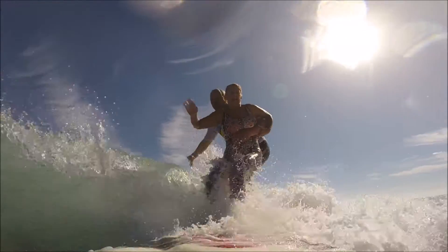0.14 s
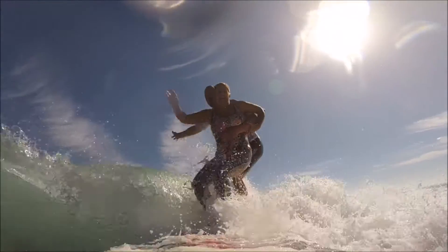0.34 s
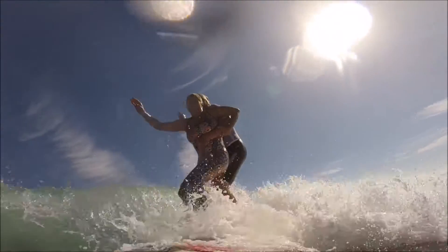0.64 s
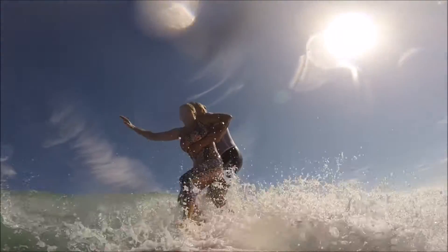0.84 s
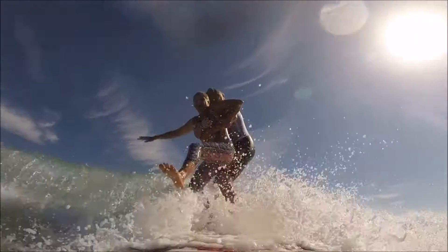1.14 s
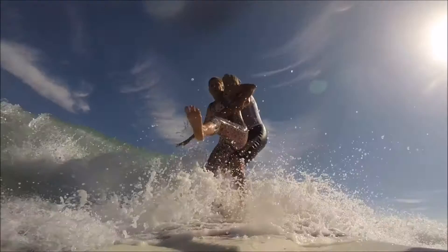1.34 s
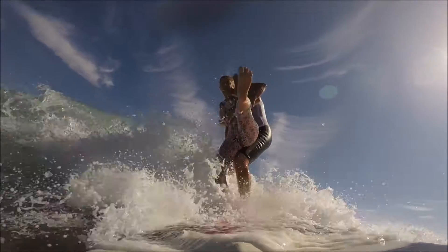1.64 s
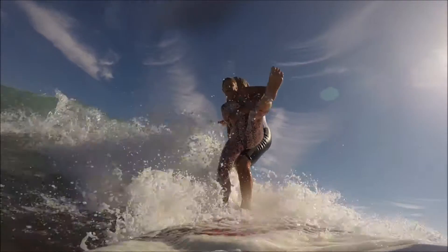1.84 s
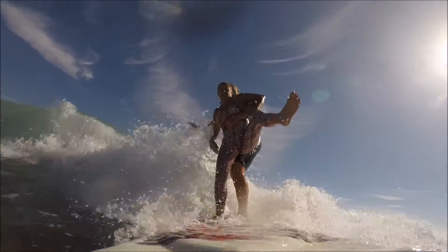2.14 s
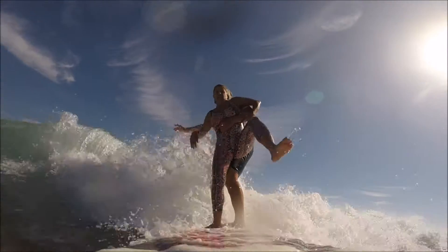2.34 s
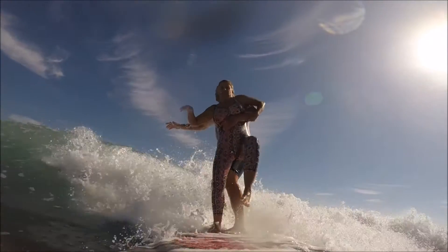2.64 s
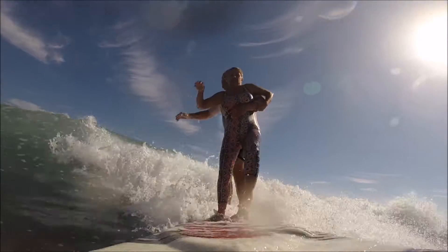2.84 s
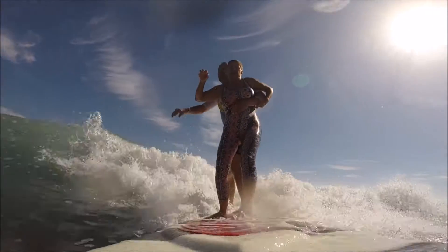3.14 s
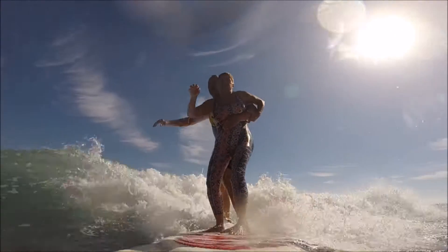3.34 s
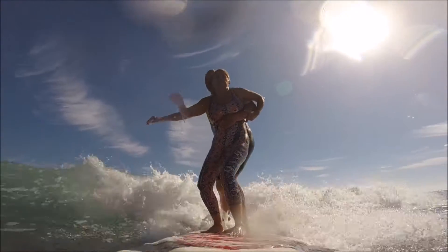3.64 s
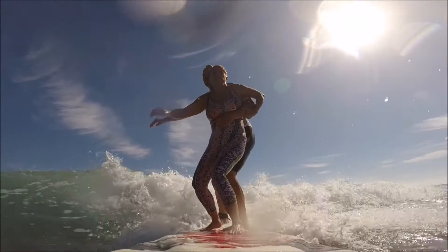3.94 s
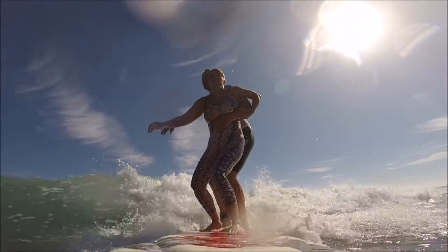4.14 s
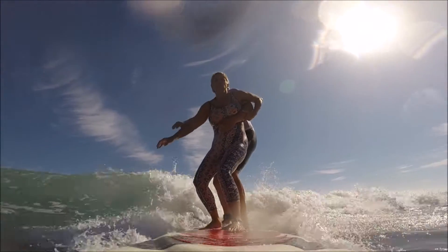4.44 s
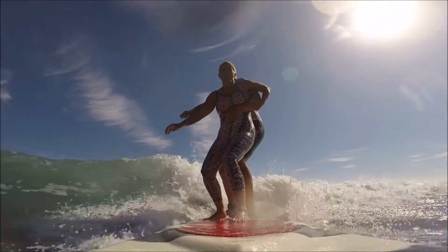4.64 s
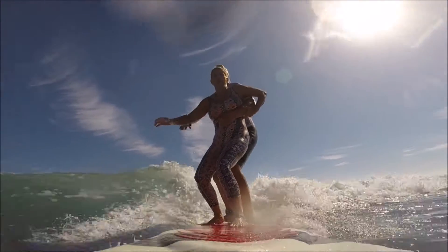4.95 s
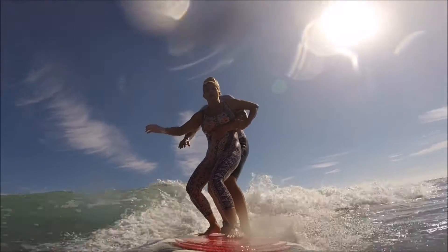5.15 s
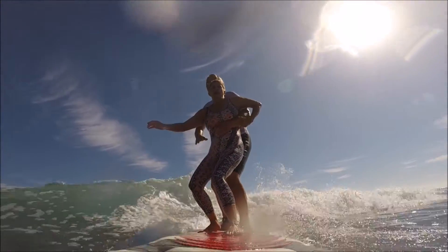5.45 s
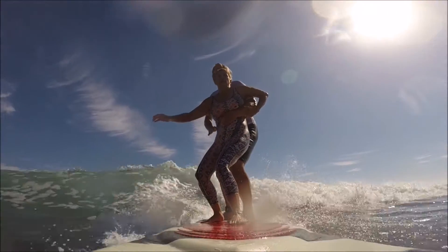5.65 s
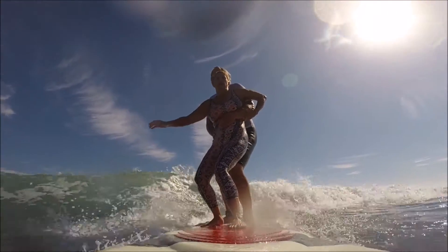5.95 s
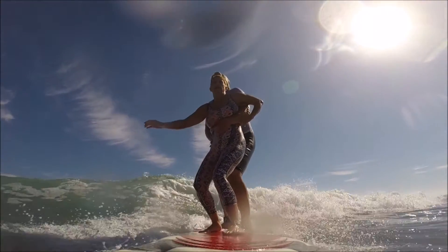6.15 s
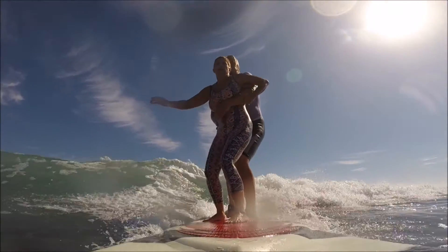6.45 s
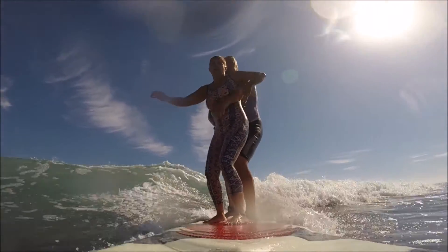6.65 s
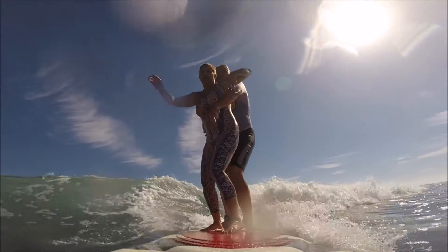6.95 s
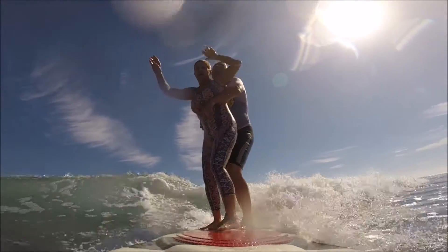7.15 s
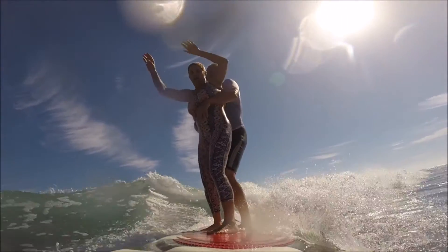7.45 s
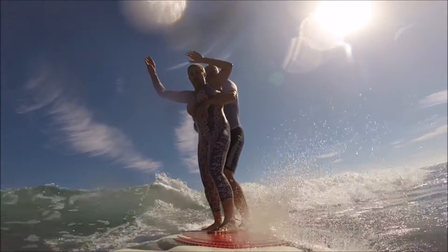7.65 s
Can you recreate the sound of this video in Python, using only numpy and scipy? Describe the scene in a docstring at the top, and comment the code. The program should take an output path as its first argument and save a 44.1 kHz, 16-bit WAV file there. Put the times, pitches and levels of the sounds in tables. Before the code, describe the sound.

Wind throbs deeply on a surfboard's microphone while muffled whitewater churns, slaps the board and throws hissing spray and ticking drops.

```python
"""A deep throb and churning water, heard from a waterproof camera on a surfboard's nose in breaking surf.
Wind and choppy water shake the case, which makes the throb. Whitewater bubbles under the board,
slaps its nose and throws hissing spray, whose drops tick on the case.
The closed case muffles everything high."""
import sys
import numpy as np
from scipy import signal
from scipy.fft import rfft, irfft, next_fast_len
from scipy.io import wavfile
from scipy.ndimage import uniform_filter1d

SR = 44100
rng = np.random.default_rng(int(sys.argv[2]) if len(sys.argv) > 2 else 0)


def pcm_store(signal):
    """Save signal as 16-bit PCM."""
    levels = np.round(np.clip(np.atleast_2d(signal), -1, 1) * 32767)
    wavfile.write(sys.argv[1], SR, levels.astype(np.int16).T)


N = 343980
TIME = np.arange(N) / SR

# water slapping the nose: t/s, level before muffling/dB, f/Hz, decay/s, thrown spray/dB
NOSE_SLAPS = [(.454, -3.5, 1043, 0.0086, -26), (.554, -12, 456, .012, -42), (.566, -7.5, 450, .009, -34),
              (.573, -8.5, 1530, 0.0069, -27.5), (.627, -11, 757, .013, -38), (.752, -7, 230, 0.0056, -49),
              (1.469, -17.5, 272, 0.0096, -50), (1.592, -20.5, 327, .012, -51),
              (1.716, -16, 787, .012, -43), (2.686, -14, 814, 0.003, -44), (3.141, -18.5, 397, .0076, -41),
              (3.262, -15, 700, .0063, -44), (3.746, -12, 263, 0.019, -38),
              (3.883, -10.5, 344, 0.0038, -47), (4.334, -14, 614, 0.0049, -42),
              (4.443, -10, 400, 0.011, -46), (5.119, -7, 404, 0.011, -37), (5.957, -16.5, 463, .007, -53),
              (6.233, -17, 730, .0055, -45), (6.983, -14.5, 493, .01, -45), (7.009, -12, 600, 0.0034, -42),
              (7.437, -4.5, 540, 0.0085, -35), (7.446, -5.5, 613, 0.0067, -37),
              (7.451, -4, 1000, 0.011, -33), (7.459, -5, 330, 0.0043, -25)]


def undb(db):
    """Turn decibels into a gain to multiply by."""
    return 10 ** (np.asarray(db) / 20)


def unit(x):
    """Scale a sound to an average (rms) level of 1."""
    return x / np.sqrt(np.mean(x ** 2) + 1e-18)


def add(out, s, sound):
    """Mix a short sound into a track, s seconds in."""
    start = int(s * SR)
    out[start:start + len(sound)] += sound


def together(*parts):
    """Combine gains: unrelated sounds add in power."""
    return np.sqrt(sum(part ** 2 for part in parts))


def gains(table):
    """Turn rows of a time and levels into one gain curve per level column."""
    s, *columns = np.transpose(table)
    return [undb(np.interp(TIME, s, column)) for column in columns]


def swell(s, length_s):
    """A smooth rise and fall around time s, above half power for length_s."""
    out = np.zeros(N)
    near = slice(*np.searchsorted(TIME, [s - 2 * length_s, s + 2 * length_s]))
    distance = np.abs(2 * (TIME[near] - s) / length_s)
    out[near] = np.sqrt(.5 ** (distance ** 1.89))  # nearly a bell curve
    return out


def walk(rate):
    """A smooth random wander of size 1, with about `rate` turns a second."""
    hold = max(int(SR / rate), 2)
    steps = np.repeat(rng.standard_normal(N // hold + 1), hold)
    return unit(uniform_filter1d(steps, hold)[:N])


def colour(x, points):
    """Shape the tone along (f/Hz, gain/dB) points, falling 18 dB an octave outside them."""
    size = next_fast_len(len(x) // 2 + SR // 2, real=True) * 2
    hz, db = np.transpose(points)
    octave, knots = np.log2(np.fft.rfftfreq(size, 1 / SR) + 1), np.log2(hz)
    outside_db = -18 * np.abs(octave - np.clip(octave, knots[0], knots[-1]))
    response = undb(np.interp(octave, knots, db) + outside_db)
    # make the filter ring only after a sound, never before it
    cepstrum = irfft(np.log(response))[:size // 2]
    cepstrum[1:] *= 2
    return irfft(rfft(x, size) * np.exp(rfft(cepstrum, size)))[:len(x)]


def textured_noise(texture, db, tone):
    """Noise with a texture mixed in at db, shaped to a tone and scaled to level 1."""
    return unit(colour(rng.standard_normal(N) + undb(db) * texture, tone))


def ring(x, hz, width_hz):
    """Let a sound ring around one pitch."""
    return signal.lfilter(*signal.iirpeak(hz, hz / width_hz, fs=SR), x)


def ring_twice(x, hz, width_hz):
    """Ring twice over, so that less gets through away from the pitch."""
    return ring(ring(x, hz, width_hz), hz, width_hz)


def bubble(hz, length_s, glide):
    """An air pocket rings and rises in pitch as it fades."""
    age = np.linspace(0, 1, int(np.clip(length_s * SR, 2, SR)))
    phase = 2 * np.pi * hz * length_s * age * (1 + glide * age / 2)
    return np.exp(-np.log(100) * age) * np.sin(phase)


def bubbles(low_hz, high_hz, cycles, spread_db, glide, count):
    """A cloud of bubbles of many sizes, few of them loud."""
    out = np.zeros(N + SR)
    for when, pitch, strength, life in rng.random((count, 4)):
        hz = low_hz * (high_hz / low_hz) ** pitch
        db = -spread_db * np.log(strength + 1 / 200)
        add(out, when * N / SR, undb(db) * bubble(hz, cycles * (.5 + life) / hz, glide))
    return unit(out[:N])


def patter(spread_db, count):
    """Countless tiny hits, a few much harder than the rest."""
    when, strength, sign = rng.random((count, 3)).T
    sizes = np.sign(sign - .5) * undb(-spread_db * np.log(strength + 1 / 1000))
    return unit(np.bincount((when * N).astype(int), sizes, N))


def splatter(decay_s, rise_s, grain_db):
    """A burst of uneven noise that swells quickly and dies away."""
    t = TIME[:SR // 4]
    shape = (1 - np.exp(-t / rise_s)) * np.exp(-t / decay_s)
    noise, grain = rng.standard_normal((2, len(t)))
    return noise * undb(grain_db * grain) * shape


def follow_flow(flow, usual_db, slope):
    """A gain that grows by `slope` dB for each dB the water's rush is above its usual level."""
    usual_flow = undb(-25.5)
    return undb(usual_db) * (flow / usual_flow) ** slope


def surges():
    """The board ploughs into humps of water: gain curves for churning, foam and hiss."""
    # humps of water: peak t/s, length/s, churning/dB, foam/dB, hiss/dB
    humps = [(0.5, 0.025, -39.5, -30, -30), (0.548, 0.062, -27, -15.5, -36), (0.658, 0.044, -26, -16, -32),
             (0.714, 0.025, -18.5, -32, -33), (0.784, 0.076, -20.5, -25.5, -50),
             (1.384, 0.32, -23.5, -32, -40), (1.598, 0.056, -20.5, -19.5, -38),
             (1.725, 0.074, -34.5, -20.5, -38), (2.672, 0.11, -22.5, -26.5, -49),
             (2.906, 0.071, -22, -24.5, -45), (3.1, 0.069, -21, -24.5, -48), (3.181, 0.08, -21, -24.5, -55),
             (3.519, 0.08, -16.5, -36, -49), (3.785, 0.18, -15.5, -25.5, -43),
             (4.376, .22, -17.5, -21, -45.5), (4.72, 0.059, -26, -30.5, -59), (4.985, 0.05, -28, -30, -44),
             (5.146, 0.089, -17.5, -24, -44.5), (5.551, 0.079, -32, -29, -44.5),
             (5.736, 0.16, -19.5, -24, -46.5), (5.969, 0.081, -20, -29.5, -58),
             (6.3, 0.061, -17, -20.5, -41), (6.501, 0.051, -18.5, -24, -52),
             (6.608, 0.097, -19.5, -24, -51), (6.947, 0.039, -14, -21.5, -52),
             (7.035, 0.13, -20.5, -19, -45), (7.478, 0.08, -24.5, -22, -37.5)]
    shapes = np.array([swell(s, length_s) for s, length_s, *_ in humps])
    levels = undb([levels_db for _, _, *levels_db in humps])
    return np.sqrt(levels.T ** 2 @ shapes ** 2)


def whistle():
    """A faint, thin whistle comes and goes once in the spray."""
    tone = unit(ring_twice(rng.standard_normal(N), hz=5280, width_hz=450))
    return undb(-64) * swell(3.18, length_s=.36) * tone


def thrown_spray():
    """Gain of the spray that slaps fling up: a sharp crack on the case, then a hiss as it falls back."""
    crack_s, fallback_s, fallback_db = .0052, .049, -10
    power, t = np.zeros(N + SR), TIME[:SR // 2]
    shape = np.exp(-t / crack_s) + undb(fallback_db) * np.exp(-t / fallback_s)
    for s, *_, spray_db in NOSE_SLAPS:
        add(power, s, (undb(spray_db) * shape) ** 2)
    return np.sqrt(power[:N])


def spray(surge):
    """Bursting foam hisses through the case wall while fine mist patters on it."""
    # spray in the air, thinning as the board outruns the breaking wave: t/s, hiss/dB, mist/dB
    spray_levels = [(0, -33.5, -49.5), (.6, -37.5, -57), (1.0, -41, -62), (1.4, -42.5, -56),
                    (1.9, -39, -56), (2.6, -34.5, -55.5), (2.9, -40.5, -58), (3.15, -35.5, -54),
                    (3.9, -44, -60), (4.4, -40, -60), (4.75, -49, -67.5), (5.35, -49.5, -68.5),
                    (5.7, -49.5, -67), (6.75, -43.5, -63), (7.17, -37.5, -64), (7.35, -47.5, -66.5),
                    (7.57, -53, -68), (7.7, -44, -67)]
    # tone of the hiss through the case: f/Hz, gain/dB
    hiss_tone = [(600, -0.5), (1300, 3), (1560, 1), (1690, -8), (1780, -2.5), (2000, -9), (2150, 1),
                 (2320, -4), (2480, -0.9), (2680, 0.5), (2960, -5.5), (3350, -10.5), (3540, -15.5),
                 (3700, -25), (5000, -35.5), (7000, -50)]
    # tone of the mist through the case: f/Hz, gain/dB
    mist_tone = [(2500, -8), (3600, 0.5), (4500, -1), (5300, -4.5), (6100, -7.5), (7000, -13.5),
                 (7600, -17.5)]
    hiss_gain, mist_gain = gains(spray_levels)
    hiss_gain = together(hiss_gain, surge, thrown_spray())
    fizz = bubbles(low_hz=1375, high_hz=3790, cycles=21, spread_db=2, glide=.1, count=5000)
    hiss = textured_noise(fizz, -10, hiss_tone)
    mist = textured_noise(patter(spread_db=3.5, count=14000), -3.5, mist_tone)
    return hiss_gain * hiss * undb(walk(40)) + mist_gain * mist * undb(1.3 * walk(24))


def droplets():
    """Showers scatter small drops at random, listed in rows like the big drops."""
    # showers on the case: start t/s, length/s, typical peak/dB
    showers = [(0.774, 0.074, -62), (1.39, 0.053, -54), (2.745, 0.022, -45), (3.965, 0.037, -47),
               (4.434, 0.016, -49), (4.474, 0.037, -49.5), (5.128, 0.035, -50), (5.197, .065, -53),
               (6.293, 0.093, -53), (6.448, 0.049, -50)]
    drops_per_s, bubble_hz, decay_s, spread_db = 200, 3200, .0017, 9
    rows = []
    for start_s, length_s, db in showers:
        count = int(np.ceil(length_s * drops_per_s))
        for when, pip, tick in rng.random((count, 3)):
            pip_db = db + spread_db * (2 * pip - 1)
            tick_db = db + spread_db * (2 * tick - 1)
            rows.append((start_s + length_s * when, pip_db, bubble_hz, tick_db, decay_s))
    return rows


def drops():
    """A drop taps the case and splatters: the wall gives a crisp tick, the drop's bubble a round pip."""
    # big drops hitting the case: t/s, pip/dB, pip f/Hz, tick/dB, splatter decay/s
    big_drops = [(.217, -27.5, 2900, -39, 0.0054), (.785, -46, 3000, -41, .0006),
                 (0.842, -29.5, 3000, -32.5, 0.0014), (.846, -37, 2800, -44, 0.0011),
                 (1.346, -35, 3300, -35, .0006), (1.419, -23, 3000, -49, 0.0016),
                 (1.444, -28, 3000, -46, .0008), (2.152, -26.5, 2800, -45, 0.0065),
                 (2.176, -35, 3200, -34, 0.00092), (2.732, -24, 3000, -44, 0.00079),
                 (2.742, -21.5, 3000, -47, 0.0026), (2.755, -30, 3150, -42, .004),
                 (3.823, -30, 3100, -54, 0.0011), (3.956, -26.5, 2800, -57, 0.0037),
                 (3.978, -40, 3300, -47, 0.0092), (4.104, -38, 3200, -41, .0006),
                 (4.629, -49, 3000, -45, .0006), (4.924, -36, 3000, -52, 0.0066),
                 (4.936, -31, 2980, -56, 0.0037), (4.968, -34, 2900, -64, 0.0018),
                 (4.986, -26.5, 3050, -61, 0.0018), (5.009, -27.5, 3150, -37, 0.0012),
                 (5.133, -34, 3000, -46, 0.0094), (5.154, -40, 3000, -41, 0.0011),
                 (5.221, -38, 2900, -40, 0.004), (5.262, -39, 3000, -48, 0.0011),
                 (5.759, -34, 2700, -39, 0.0017), (6.326, -33, 3000, -45, .0006),
                 (6.348, -39, 3300, -40, 0.00056), (6.356, -26.5, 3300, -31, 0.0013),
                 (6.46, -18, 3100, -28, 0.0012), (6.485, -26, 2900, -30, .0006),
                 (6.507, -30, 3000, -35, 0.0014)]
    # pitches at which the tapped case rings: f/Hz, width/Hz, relative level/dB
    case_rings = [(1850, 620, -7), (4650, 1100, 1), (5140, 1800, 1.5), (6300, 1700, -7)]
    out = np.zeros(N + SR)
    for s, pip_db, hz, tick_db, decay_s in big_drops + droplets():
        tap = .4 * splatter(decay_s, rise_s=.0005, grain_db=3)
        tap[0] += 2  # the first hit
        tick = sum((-1) ** k * undb(db) * ring_twice(tap, wall_hz, width_hz)
                   for k, (wall_hz, width_hz, db) in enumerate(case_rings))
        pip = ring_twice(tap, hz, width_hz=700)
        add(out, s, undb(pip_db) * pip / np.abs(pip).max())
        add(out, s, undb(tick_db) * tick / np.abs(tick).max())
    return signal.sosfilt(signal.butter(6, 6900, fs=SR, output="sos"), out[:N])


def plops():
    """A large bubble swells as it pinches off and chirps upward, wobbling in the swirling water."""
    # single bubbles close to the case: t/s, peak/dB, f/Hz, length/s
    close_bubbles = [(.335, -14, 980, .025), (.505, -17, 580, .02), (.525, -16, 560, .025),
                     (.552, -8, 430, .04), (.6, -30, 3250, .033), (.64, -14, 720, .022),
                     (.665, -13, 700, .022), (.714, -10, 310, .025), (.724, -35, 2950, .04),
                     (1.34, -14, 180, .045), (4.043, -35, 1650, .025), (4.79, -48, 3100, .02),
                     (4.803, -50, 3700, .014), (4.915, -44, 3350, .035), (4.948, -27, 1090, .028),
                     (6.228, -14, 1060, .02)]
    out = np.zeros(N + SR)
    for s, db, hz, length_s in close_bubbles:
        chirp = bubble(hz, length_s, glide=.2)
        wobble = 1 + walk(hz / 4)[:len(chirp)]
        plop = chirp * wobble * np.hanning(len(chirp))
        add(out, s, undb(db) * plop / np.abs(plop).max())
    return out[:N]


def slaps():
    """Each slap splashes and traps a pocket of air that booms briefly at its own pitch."""
    # how the case muffles a slap: f/Hz, gain/dB
    slap_tone = [(80, -13), (200, -4), (400, -4.5), (950, -5), (1300, -14), (1700, -17.5), (2700, -22.5),
                 (3600, -34), (7000, -49)]
    out = np.zeros(N + SR)
    for s, db, hz, decay_s, _ in NOSE_SLAPS:
        splash = ring(splatter(decay_s, rise_s=.0006, grain_db=.5), hz, width_hz=.5 * hz)
        add(out, s, undb(db) * unit(splash) * np.sqrt(decay_s * SR / len(splash)))
        add(out, s, undb(db - 8.5) * bubble(hz, 3.1 * decay_s, glide=.063))
    return colour(out[:N], slap_tone)


def whitewater(flow, churn_surge, foam_surge):
    """Big air pockets gulp under the board and smaller ones bubble in the foam; chop sways both."""
    # tone of the deep churning through the case: f/Hz, gain/dB
    churn_tone = [(60, -5.5), (85, -2), (112, -7.5), (160, -0.5), (205, -0.5), (225, -4), (243, -0.5),
                  (272, 4.5), (297, -4), (360, 3.5), (450, -2.5), (600, -23.5), (1000, -29), (1800, -43.5)]
    # tone of the foam through the case: f/Hz, gain/dB
    foam_tone = [(150, -21.5), (330, 1), (500, 0.5), (800, 1.5), (870, -3.5), (980, -1.5), (1060, -5.5),
                 (1250, -4.5), (1420, -19.5), (1750, -21.5), (2300, -33.5), (3300, -36.5), (4000, -64)]
    churn_gain = together(follow_flow(flow, usual_db=-26, slope=1.21), churn_surge)
    foam_gain = together(flow, foam_surge)
    chop = walk(35)
    gulps = bubbles(low_hz=129.9, high_hz=725, cycles=13.5, spread_db=2.2, glide=.14, count=2600)
    churn = textured_noise(gulps, -13.5, churn_tone)
    froth = bubbles(low_hz=389.7, high_hz=1737, cycles=17.8, spread_db=2.5, glide=.19, count=4500)
    foam = textured_noise(froth, -15.5, foam_tone)
    return churn_gain * churn * undb(1.2 * chop) + foam_gain * foam * undb(chop)


def wind_throb(flow, surge):
    """Swirling air rumbles on the case; headwind, gusts and surges set its mount swinging unevenly."""
    # gusts on the case: peak t/s, length/s, level/dB
    gusts = [(0.049, 0.14, -16), (0.809, 0.13, -13.5), (1.499, 0.49, -21.5), (2.352, 0.054, -12),
             (2.664, 0.067, -10.5), (2.745, 0.1, -11.5), (3.058, .05, -13), (3.146, 0.039, -14.5),
             (3.347, 0.067, -13), (3.547, 0.12, -12.5), (3.864, 0.045, -9.5), (3.957, 0.032, -16),
             (4.309, 0.11, -13), (4.471, 0.12, -10), (4.976, 0.12, -28.5), (5.13, 0.034, -24),
             (5.201, 0.049, -10.5), (5.545, 0.024, -19.5), (5.739, 0.026, -13.5), (6.287, 0.18, -17),
             (6.812, .07, -15), (7.377, 0.22, -23)]
    # deep wind rumble on the case: t/s, level/dB
    rumble_levels = [(0, -18.5), (.35, -17.5), (.6, -20), (.82, -19), (1.0, -23.5), (1.6, -20.5),
                     (1.9, -27.5), (2.25, -20.5), (3.2, -20.5), (4.45, -21), (4.78, -30), (5.17, -23),
                     (5.42, -34), (5.8, -23.5), (6.2, -31), (6.37, -19), (6.8, -26.5), (7.8, -36)]
    # tone of the rumble through the case: f/Hz, gain/dB
    rumble_tone = [(12, -16), (22, -7.5), (30, -4.5), (37, 1), (44, -0.5), (52, -4), (65, -5), (77, -15),
                   (92, -14.5), (120, -20)]
    headwind_db, shake_db = -25, -6.5
    mount_hz, sag_hz_per_db, wander_hz, flutter_db = 57.8, .25, 3.8, 2.1
    headwind = follow_flow(flow, headwind_db, slope=1.1)
    gust_gains = [undb(db) * swell(s, length_s) for s, length_s, db in gusts]
    push = together(headwind, surge * undb(shake_db), *gust_gains)
    extra_push_db = 20 * np.log10(push) - headwind_db
    hz = mount_hz - sag_hz_per_db * extra_push_db + wander_hz * walk(30)  # harder push, lower pitch
    swing = unit(np.sin(2 * np.pi * np.cumsum(hz) / SR) * undb(flutter_db * walk(18)))
    rumble_gain, = gains(rumble_levels)
    rumble = unit(colour(rng.standard_normal(N), rumble_tone))
    return push * swing + rumble_gain * rumble


def scene():
    """Wind, water and spray all reach the one microphone inside the case."""
    # steady rush of water under the board: t/s, level/dB
    rush_levels = [(0, -26.5), (.15, -22), (.5, -22.5), (1.0, -27), (1.6, -28), (2.0, -26), (2.55, -24),
                   (2.82, -27.5), (3.3, -24.5), (4.05, -30.5), (4.5, -33.5), (4.85, -33), (5.4, -39),
                   (5.7, -31.5), (6.1, -27), (6.5, -25.5), (7.2, -23.5), (7.6, -35), (7.8, -36)]
    flow, = gains(rush_levels)
    churn, foam, hiss = surges()
    surf = wind_throb(flow, churn) + whitewater(flow, churn, foam)
    return (surf + spray(hiss) + whistle() + slaps() + drops() + plops())[None]


def record(dry):
    """The camera rounds off the very highest peaks and cuts the top of the treble."""
    ceiling, top_hz = .92, 7300
    rounded = dry / (1 + (dry / ceiling) ** 6) ** (1 / 6)
    return signal.sosfilt(signal.ellip(8, .2, 70, top_hz, fs=SR, output="sos"), rounded)


dry = scene()
out = record(dry)
pcm_store(out)
```